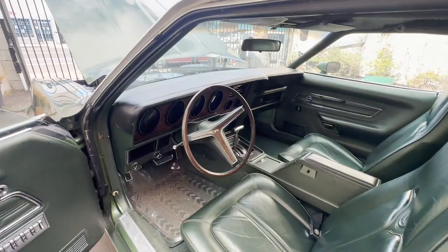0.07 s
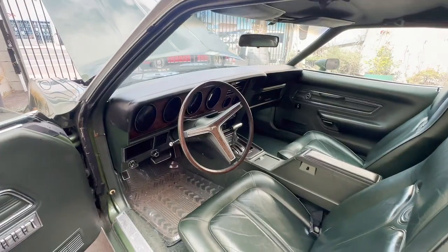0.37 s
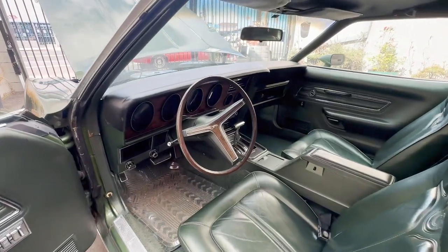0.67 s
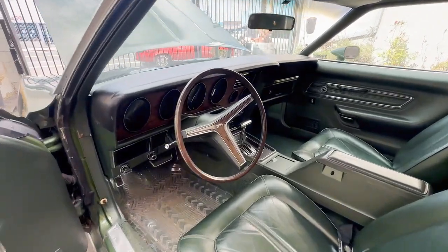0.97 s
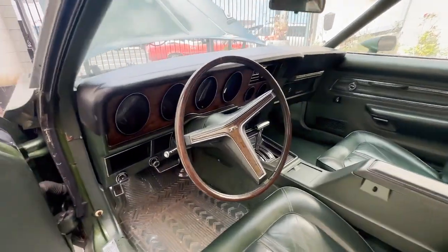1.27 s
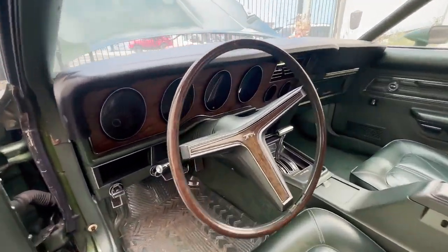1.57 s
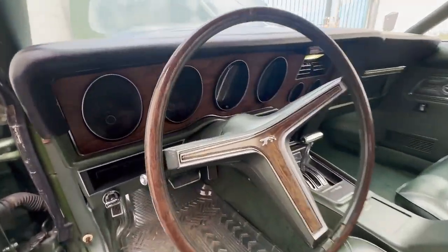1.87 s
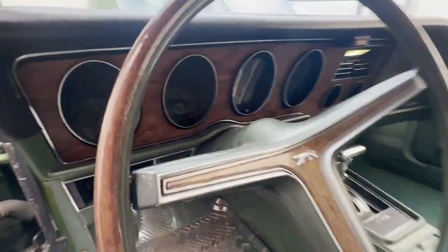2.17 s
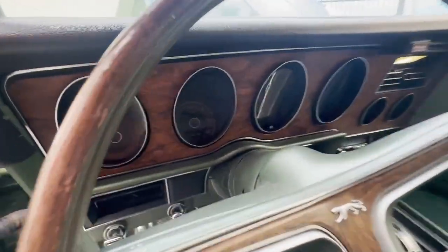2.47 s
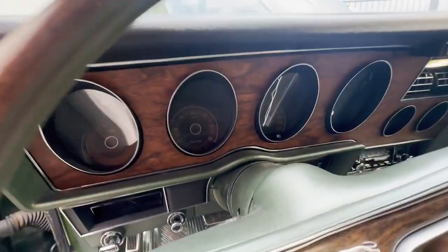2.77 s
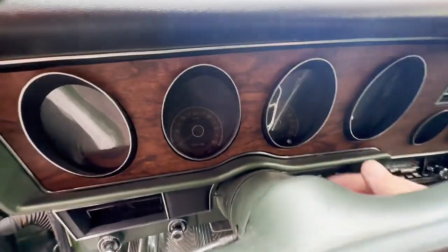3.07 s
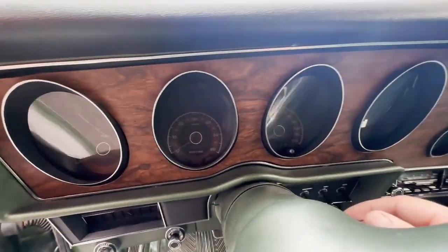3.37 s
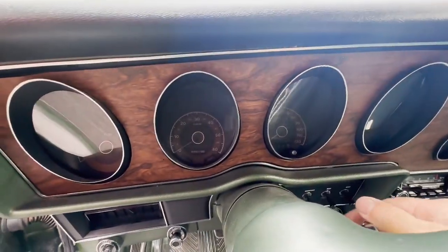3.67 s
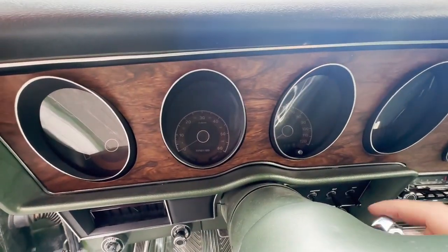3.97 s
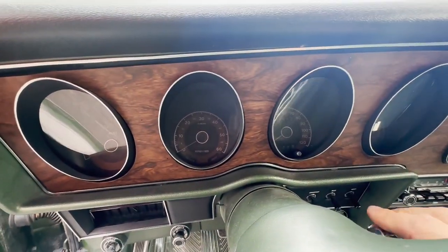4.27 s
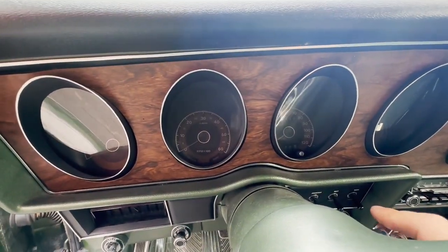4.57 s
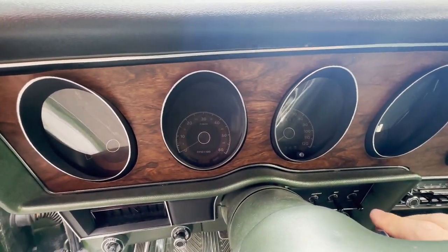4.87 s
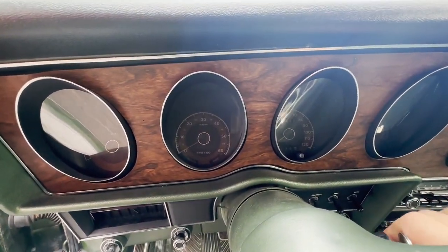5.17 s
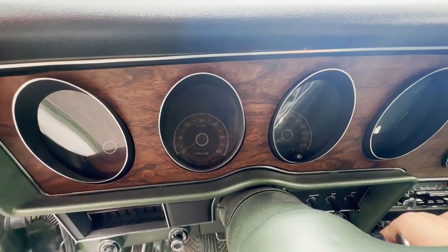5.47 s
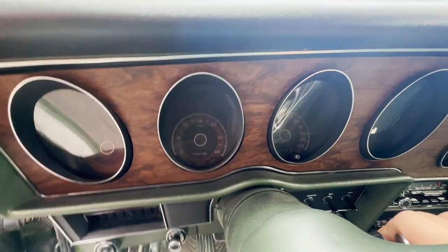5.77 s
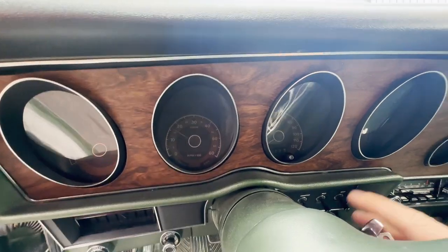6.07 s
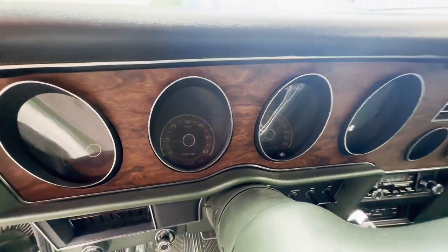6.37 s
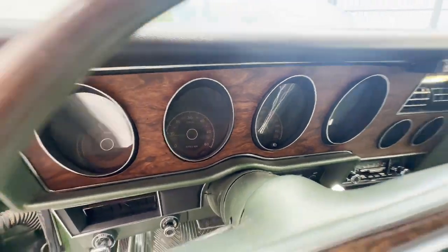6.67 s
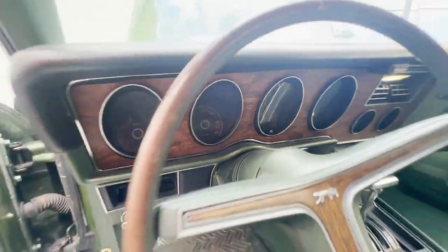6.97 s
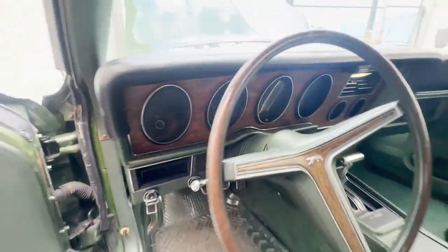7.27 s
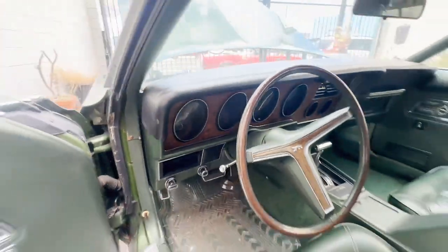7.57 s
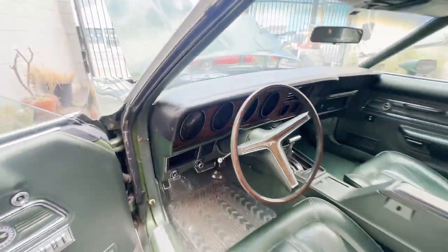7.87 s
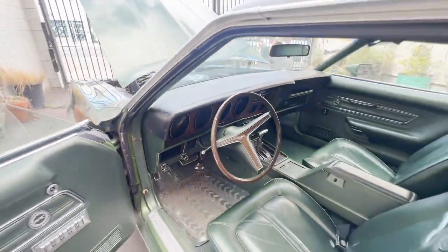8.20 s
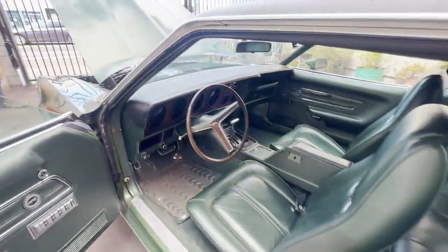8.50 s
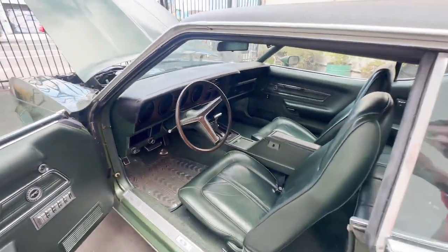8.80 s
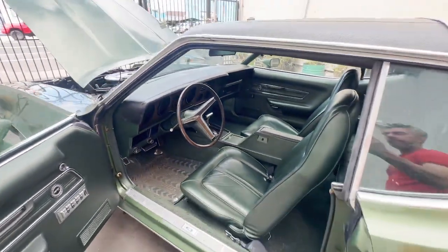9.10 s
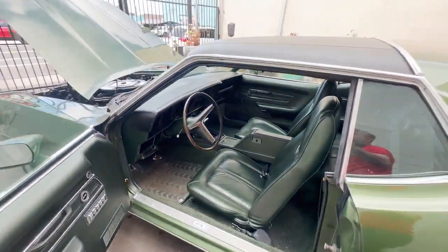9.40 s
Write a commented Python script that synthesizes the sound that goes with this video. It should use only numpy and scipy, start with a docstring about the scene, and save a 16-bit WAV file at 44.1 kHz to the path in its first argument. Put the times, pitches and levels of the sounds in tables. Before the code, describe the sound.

After keys clink and scrape into the lock, an old car engine starts with a boom and drops to a low, throbbing idle.

```python
"""An old V8 coupe starts from cold in a yard: it flares, booms through its exhaust and sinks to a loping
idle, one puff of gas and one valve tick to each firing. Before that, keys clink and scrape into the lock;
the starter slams in and cranks, the belt squeaks, and the pinion grinds as the engine catches.
The microphone moves in through the open door to the dash, then back outside for the idle.
Traffic rumbles in the distance."""
import sys
import numpy as np
from scipy import signal
from scipy.fft import rfft, irfft, next_fast_len
from scipy.io import wavfile
from scipy.ndimage import uniform_filter1d, map_coordinates

SR = 44100
rng = np.random.default_rng(int(sys.argv[2]) if len(sys.argv) > 2 else 0)


def put_to_file(sound):
    """Save the sound as 16-bit audio at rate SR, in the file named by the first command-line argument."""
    columns = np.atleast_2d(sound).T  # one column per channel
    safe = np.clip(columns, -1, 1)
    whole_steps = np.round(safe * 32767)
    wavfile.write(sys.argv[1], SR, whole_steps.astype(np.int16))


N = 425124
CATCH_S, IDLE_RPM = 5.71, 750

# The cylinders in firing order. Each row: exhaust strength in dB, valve clatter in dB.
CYLINDERS = [(3, 2.5), (0, 5.5), (-1, 2.5), (2.5, 2.5), (-5.5, 1.5), (-4, 1), (-5.5, 2), (-2, -0.5)]
# Starter, compressions and first firing rock the block. Each row: start in seconds, then thump, sway,
# exhaust chuff and motor strain in dB.
JOLTS = [(5.094, -26, -36, -55, -47), (5.118, -13, -31, -37, -39), (5.168, -22, -34, -33, -42),
         (5.33, -28.5, -36, -34.5, -41), (5.52, -43, -44, -56, -37), (5.691, -36, -21, -33, -43)]
# The engine sits slightly left of the microphone. Each row: frequency in Hz, left over right in dB.
ENGINE_PAN = [(60, 1.0), (240, 1.5), (950, 3), (3770, 2.0), (15000, 1.6)]


def amp(db):
    """Decibels to gain."""
    return 10 ** (np.asarray(db) / 20)


def unit(x):
    """Scale so that the mean of the channels has rms 1."""
    return x / np.sqrt(np.mean(np.atleast_2d(x).mean(0) ** 2) + 1e-20)


def along(points, hz):
    """Read (Hz, value) points on a log frequency axis."""
    freqs, values = np.transpose(points)
    return np.interp(np.log(hz + 1), np.log(freqs), values)


def curve(points):
    """One value per sample from (seconds, value) points."""
    return np.interp(np.arange(N) / SR, *np.transpose(points))


def fade(start, end):
    """A ramp from 0 at start to 1 at end, in either direction."""
    return np.clip((np.arange(N) / SR - start) / (end - start), 0, 1)


def held(start, length, attack_s, release_s):
    """Gain 1 from start for length seconds; the attack before and the release after each span 60 dB."""
    t = np.arange(N) / SR - start
    return amp(-60 * np.clip(np.maximum(-t / attack_s, (t - length) / release_s), 0, 2))


def wobble(rate):
    """A smooth random curve, rate knots a second."""
    return map_coordinates(rng.standard_normal(int(N * rate / SR) + 4), [np.arange(N) * rate / SR])


def add(track, start, sound):
    """Mix a short sound into a track at start seconds."""
    part = track[..., round(start * SR):][..., :sound.shape[-1]]
    part += sound[..., :part.shape[-1]]


def filtered(x, response):
    """Pass x through a response given as a function of Hz."""
    size = 2 * next_fast_len(N // 2 + SR // 4)
    return irfft(rfft(x, size) * response(np.fft.rfftfreq(size, 1 / SR)), size)[..., :N]


def causal(spectrum):
    """The minimum-phase response with a given (Hz, dB) spectrum."""
    def response(hz):
        cepstrum = irfft(np.log(amp(along(spectrum, hz))))
        half = len(cepstrum) // 2
        cepstrum[1:half] *= 2
        cepstrum[half + 1:] = 0
        return np.exp(rfft(cepstrum))
    return response


def resonance(f, hz, width):
    """The response at f of two like resonators in series, each width Hz wide."""
    return (1j * f * width / (hz * hz - f * f + 1j * f * width)) ** 2


def narrow(hz, width):
    """Unrelated left and right noise in one resonance."""
    return unit(filtered(rng.standard_normal((2, N)), lambda f: resonance(f, hz, width)))


def spread(pair, pan):
    """A direct and a scattered signal become left and right at the microphone."""
    # Stereo width. Each row: frequency in Hz, side gain in dB.
    width = [(60, -22), (150, -5.5), (380, -4), (950, 1), (2380, 0), (5980, 1), (15000, -12)]
    mid, side = pair[0], filtered(pair[1], lambda hz: amp(along(width, hz)))
    left_right = np.array([mid + side, mid - side])
    return filtered(left_right, lambda hz: amp(np.outer([.5, -.5], along(pan, hz))))


def rush(spectrum, pan):
    """Stereo noise with a given (Hz, dB) spectrum, at unit level."""
    noise = filtered(rng.standard_normal((2, N)), lambda hz: amp(along(spectrum, hz)))
    return unit(spread(noise, pan))


def cabin(x, wet_db, t60=0.1):
    """Dash, glass and seats return a short, dense echo, different on each side of the microphone."""
    t = np.arange(SR // 5) / SR
    tail = rng.standard_normal((2, len(t))) * amp(-60 * t / t60) * (t > .002)
    echo = signal.fftconvolve(x, tail / np.linalg.norm(tail[0]), axes=1)[:, :N]
    return (x + amp(wet_db) * echo) / np.hypot(1, amp(wet_db))


def distant_traffic(outside):
    """A throbbing rumble from far off, with tyre noise and a midrange hum that the cabin shields."""
    # Two noise spectra. Each row: frequency in Hz, level in dB.
    rumble_spectrum = [(13, -43), (22, -11), (43, -1.5), (70, -4), (102, 4), (134, -5), (150, -13),
                       (198, -9.5), (400, -19.5), (520, -41), (880, -120)]
    tyre_spectrum = [(140, -30), (270, -7), (480, -2), (690, -1), (820, -1.5), (1100, -3.5), (1650, -11.5),
                     (2350, -19), (3300, -31), (5200, -38), (14500, -65)]
    # The street lies slightly left. Each row: frequency in Hz, left over right in dB.
    pan = [(60, 1.0), (380, 2.6), (2380, 2.0), (15000, 2.0)]
    rumble = amp(-45.5 + 1.65 * wobble(12)) * rush(rumble_spectrum, pan)
    tyres = amp(-53 + 5.5 * outside + 0.74 * wobble(10)) * rush(tyre_spectrum, pan)
    hum = amp(-49) * outside * narrow(hz=741, width=164)
    return rumble + tyres + hum


def ignition_key():
    """Close by at the dash, keys ring together while the blade scrapes and clicks over the lock's pins."""
    # Two keys collide. Each row: start in seconds, then contact, long key and short key in dB.
    clinks = [(3.032, -39.5, -46.5, -72), (3.249, -43, -40.5, -58), (3.577, -29.5, -42, -33),
              (3.590, -37, -50, -38), (3.655, -43, -56, -36), (4.079, -26.5, -40, -36),
              (4.145, -25, -37, -40), (4.203, -53, -53, -56), (4.57, -40.5, -56, -46.5)]
    # Modes of each key. Each row: frequency in Hz, level in dB, seconds to fall 60 dB.
    long_key = [(2550, -4, 0.048), (6175, -0.5, 0.077), (7100, -9, .05), (7760, -0.5, 0.1),
                (8285, -13, .13)]
    short_key = [(5070, -17, .12), (5540, -17, .12), (7730, -4.5, 0.2), (12100, 0, 0.094),
                 (13250, -11, .04), (14840, -15, .07)]
    # Trim, lock, switch and solenoid. Each row: start in seconds, snap in dB, knock against snap in dB.
    clicks = [(.902, -46.5, -4), (0.99, -44.5, 4), (1.768, -50, 12.5), (2.093, -46.5, 6.5),
              (2.42, -51.5, 16.5), (2.549, -45.5, 4.5), (3.401, -34.5, -4.5), (3.418, -41, -2),
              (3.451, -28, -17), (3.512, -40, 6.5), (3.625, -27.5, -9), (3.672, -26.5, -10),
              (3.681, -32, -18), (3.824, -43, -18), (3.875, -43, -17), (4.057, -27, -15),
              (4.105, -25.5, -10.5), (4.232, -29, -0.5), (4.881, -49, 2), (4.963, -33, -1),
              (4.997, -27, -5.5), (5.074, -34, 5)]
    # The switch rings the dash. Each row: start in seconds, pitch in Hz, level in dB, t60 in seconds.
    detents = [(4.961, 525, -34.5, 0.33), (4.998, 1105, -38, 0.18)]
    # Sleeve and key slide. Each row: start in seconds, length in seconds, level in dB.
    strokes = [(1.194, 1.47, -65.5), (2.754, 0.65, -71.5), (2.155, 0.024, -68), (2.305, 0.2, -66.5),
               (3.114, 0.081, -63), (3.53, 0.42, -56.5), (3.688, 0.076, -52.5), (3.95, 0.018, -54),
               (4.067, 0.053, -52), (4.396, .27, -61), (4.877, 0.19, -57)]
    # Spectra of the contacts and of the steering column under them. Each row: frequency in Hz, level in dB.
    scrape_spectrum = [(710, -36), (1200, -5), (1340, -0.5), (4500, -11.5), (8040, -12), (15600, -29)]
    snap_spectrum = [(1180, -17), (2000, -8), (3560, -8.5), (4340, -7), (5110, -7), (7030, -4.5),
                     (10700, -10), (12400, -19), (15600, -15)]
    knock_spectrum = [(200, -30), (550, 2), (1400, 0.5), (2500, -7.5), (5000, -33)]
    column_spectrum = [(110, -17), (170, 3), (330, -5.5), (560, -6.5), (1100, -25), (2500, -60)]
    # The lock is to the left. Each row: frequency in Hz, left over right in dB.
    pan = [(60, 1.0), (240, 1.5), (950, 3.8), (3770, 7.2), (15000, 2.9)]
    t = np.arange(SR // 3) / SR
    rings, snaps, knocks = np.zeros((2, N)), np.zeros(N), np.zeros(N)
    onset = 1 - np.exp(-t / 0.00077)
    click_decay = amp(-60 * t / .07)
    for start, contact_db, long_db, short_db in clinks:
        rebound_s = .012 * rng.uniform(.5, 1.5)  # loose keys touch again, more softly
        for delay, loss_db in (0, -1), (rebound_s, -7):
            for db, modes in (long_db, long_key), (short_db, short_key):
                for hz, mode_db, t60 in modes:
                    size = amp(db + loss_db + mode_db + rng.normal(0, 2.4, (2, 1)) - 60 * t / t60)
                    pitch = hz * (1 + rng.normal(0, .003))
                    cycles = pitch * t + 0.4 * rng.random((2, 1))
                    add(rings, start + delay, onset * size * np.sin(2 * np.pi * cycles))
        add(snaps, start, onset * amp(contact_db - 5.5) * click_decay)
    # the trim's rattle outlasts the contact itself
    click = (1 - np.exp(-t / 0.00089)) * (1.11 * click_decay + 0.84 * amp(-60 * t / 0.0091))
    for start, db, knock_db in clicks:
        add(snaps, start, amp(db - 8.5) * click)
        add(knocks, start, amp(db + knock_db - 3.5) * click)
    for start, hz, db, t60 in detents:
        add(rings, start, onset * amp(db - 60 * t / t60) * np.sin(2 * np.pi * hz * t))
    sliding = sum(amp(db) * held(s, length, attack_s=0.093, release_s=0.52) for s, length, db in strokes)
    scrape = amp(2.7 * wobble(70) + 2.8 * wobble(400) - 1) * rush(scrape_spectrum, pan)
    column = amp(0.5) * rush(column_spectrum, pan)
    contacts = snaps * rush(snap_spectrum, pan) + knocks * rush(knock_spectrum, pan)
    return rings + cabin(contacts + sliding * (scrape + column), wet_db=-7.5)


def starter(firings, rpm):
    """The motor labours over each compression; the engine outruns it and the pinion grinds on the ring."""
    # Two noise spectra. Each row: frequency in Hz, level in dB.
    motor_spectrum = [(180, -31), (300, 1), (478, 0), (554, 0.5), (883, -2.5), (1000, -7), (1730, -9.5),
                      (1990, -14), (2550, -12.5), (3200, -23), (4160, -18), (7040, -120)]
    gear_spectrum = [(880, -18), (1500, -5), (1640, -5), (1940, -4.5), (2220, -5.5), (2620, -3),
                     (3100, -9.5), (6040, -13), (7420, -16), (8030, -13), (15600, -37.5)]
    # Modes of the ring gear. Each row: frequency in Hz, half-width in Hz, level in dB.
    ring_gear = [(1267, 22, -1.5), (1340, 21, 4), (1570, 7, 2.5), (1890, 18, -4.5), (1946, 20, -8),
                 (1960, 12, -7), (2115, 14, -9), (2560, 12, -12), (2584, 10, 0.5), (2640, 12, -3),
                 (2745, 10, -8)]
    # The starter is well to the left. Each row: frequency in Hz, left over right in dB.
    pan = [(60, 0.0), (180, 18), (550, 1.5), (1650, 6.5), (4970, 11.5), (15000, 0)]
    engage_s = 5.1
    slam = held(engage_s, 0.019, attack_s=0.07, release_s=0.19)
    spin = held(engage_s, .83, attack_s=0.12, release_s=1)
    race = (rpm / 1000) ** 2
    motor_gain = amp(-32) * slam + amp(-39 + 5.9 * race) * spin
    gear_gain = amp(-26.5) * slam + amp(-50 + 20.9 * race) * spin
    strain = sum(amp(db) * held(s, 0.014, attack_s=0.14, release_s=0.076) for s, *_, db in JOLTS)
    load = np.cos(2 * np.pi * firings)
    motor = (motor_gain + strain) * amp(1.3 * load) * rush(motor_spectrum, pan)
    gears = gear_gain * amp(2.0 + wobble(150)) * rush(gear_spectrum, pan)
    teeth = rng.standard_normal((2, N)) * amp(2.5 * load + 1.1 * wobble(200))
    modes = lambda f: sum(amp(db) / (1 + ((f - hz) / width) ** 2) for hz, width, db in ring_gear)
    overrun = held(5.755, 0.2, attack_s=0.12, release_s=0.23)
    grind = overrun * amp(-20.5 + 1.5 * load) * unit(spread(filtered(teeth, modes), pan))
    return cabin(motor + gears, wet_db=-9) + grind


def belt_squeaks():
    """The cold belt chirps as it takes up speed, then whistles faintly as the speed sinks."""
    # Each row: start in seconds, pitch in Hz, width in Hz, level in dB, seconds to fall 60 dB.
    squeaks = [(5.512, 5500, 600, -34.5, 0.21), (5.565, 10640, 330, -42, 0.26),
               (5.66, 9900, 400, -39, 0.46)]
    t = np.arange(SR // 2) / SR
    onset = 1 - np.exp(-t / 0.0065)
    belt = amp(-60) * held(6.6, 0.89, attack_s=.9, release_s=0.99) * narrow(hz=8750, width=280)
    for start, hz, width, db, t60 in squeaks:
        add(belt, start, narrow(hz, width)[:, :len(t)] * amp(db + 3.5 - 60 * t / t60) * onset)
    return belt


def block_jolts():
    """The engine block thumps and sways on its mounts."""
    # Each row: frequency in Hz, level in dB, seconds to fall 60 dB.
    block_modes = [(57, -7.5, 0.87), (85.5, -4, 0.6), (130.5, 6, 0.19), (150.7, 4.5, 0.27), (265, -9, .15)]
    t = np.arange(SR // 2) / SR
    onset = 1 - np.exp(-t / 0.0065)
    thump = sum(amp(db - 60 * t / t60) * np.sin(2 * np.pi * hz * t) for hz, db, t60 in block_modes)
    sway = amp(-60 * t / 0.58) * np.sin(2 * np.pi * 39 * t)
    block = np.zeros(N)
    for start, thump_db, sway_db, *_ in JOLTS:
        add(block, start, (amp(thump_db) * thump + amp(sway_db) * sway) * onset)
    return block


def body_drone(firings, outside):
    """The body panels hum, swelling once in each round of the cylinders."""
    # Each row: frequency in Hz, level at the dash in dB, level outside in dB.
    panels = [(169.5, -61.5, -30), (204.2, -30, -44), (223.4, -41.5, -32)]
    throb = 1 + 0.64 * np.cos(2 * np.pi * (firings / len(CYLINDERS) - .12))
    hum = np.zeros(N)
    for hz, dash_db, outside_db in panels:
        gain = amp(dash_db + (outside_db - dash_db) * outside + 1.3 * wobble(14))
        hum += gain * np.sin(2 * np.pi * np.cumsum(hz + 9 * wobble(25)) / SR)
    return throb * hum


def engine_bay(firings, rpm, outside):
    """The fan rushes; valve gear ticks at every firing, one tappet louder than the rest."""
    # Two noise spectra. Each row: frequency in Hz, level in dB.
    fan_spectrum = [(190, -15.5), (330, 0.5), (388, -4.5), (875, -6.5), (1420, -12), (1700, -10.5),
                    (2070, -19), (2540, -21.5), (2800, -17), (3640, -29), (6160, -120)]
    clatter_spectrum = [(1180, -34), (2000, -5.5), (2300, -6.5), (2570, -3), (3320, -4.5), (3880, -4.5),
                        (5290, -5.5), (5720, -7), (7530, -7), (8070, -7), (10400, -11), (11900, -16.5),
                        (14000, -16), (15600, -23)]
    # Modes of the rocker covers. Each row: frequency in Hz, width in Hz, level in dB.
    cover_modes = [(2586, 310, -5.5), (3820, 450, -5.5), (5870, 500, -8)]
    brief_rattle = amp(-45.5) * held(7.85, 0.034, attack_s=1.0, release_s=0.15)
    valve_gain = amp(-49 + 9.67 * outside) + brief_rattle
    stroke = firings + .35  # the valves close ahead of the puff
    tappet = stroke.astype(int)
    tappet_db = np.array(CYLINDERS)[tappet % len(CYLINDERS), 1]
    tappet_db += 1.15 * rng.standard_normal(N // 100)[tappet]
    ticks = amp(tappet_db) * (0.74 + 0.65 * np.exp(-3.5 * (stroke % 1)))
    clatter = ticks * rush(clatter_spectrum, ENGINE_PAN)
    fan_db = -40.5 + 4.83 * outside + 8.2 * (rpm - IDLE_RPM) / 1000
    fan = amp(fan_db + 0.31 * tappet_db + 1.23 * wobble(70)) * rush(fan_spectrum, ENGINE_PAN)
    # each closing valve strikes the covers, which ping at new strengths
    closings = np.flatnonzero(np.diff(tappet))
    ping_decay = amp(-60 * np.arange(SR // 10) / SR / 0.056)
    pings = np.zeros((2, N))
    for hz, width, db in cover_modes:
        strike_db = tappet_db[closings] + 4 * rng.uniform(-2.4, 1.57, len(closings))
        strikes = np.bincount(closings, amp(strike_db), N)
        pings += amp(db) * signal.fftconvolve(strikes, ping_decay)[:N] * narrow(hz, width)
    return (fan + valve_gain * (clatter + amp(-2.5) * pings)) * fade(5.4, 6.2)


def exhaust(firings, rpm, outside, running):
    """One puff per firing; strong and weak cylinders make the pipe's tones lope and set it ringing."""
    # Each row: multiple of the crank speed, level while misfiring in dB, level while running in dB.
    slow_tones = [(4, -30, -31.5), (5, -13.5, -51)]
    # The pipe booms as twice the firing rate passes its resonance. Each row: that tone in Hz, level in dB.
    boom_curve = [(92, -19.5), (101, -15), (107, -9), (115, -10.5), (123, -25), (140, -50)]
    # Heard out in the yard. Each row: multiple of the crank speed, level in dB.
    pipe_overtones = [(20, -40), (24, -46.5), (26, -45)]
    # The slower it runs, the more it lopes. Each row: speed in rpm, depth from 0 to 1.
    lope_depth = [(765, 0.97), (810, 0.4)]
    # Resonances of the tailpipe. Each row: frequency in Hz, width in Hz, level in dB.
    pipe_modes = [(104.5, 22.3, 4), (45, 30, -10.5)]
    # Each row: frequency in Hz, level in dB.
    puff_spectrum = [(20, -31), (40, -3), (90, -4), (135, 6.5), (175, -0.5), (205, 1), (245, -3), (280, -7),
                     (330, -10), (420, -19.5), (700, -46.5), (1600, -100)]
    fired_at = np.flatnonzero(np.diff(np.floor(firings)) > 0)
    pulses = lambda sizes: np.bincount(fired_at, sizes, N)
    cylinder = np.arange(1, len(fired_at) + 1) % len(CYLINDERS)
    chance = rng.standard_normal((len(fired_at), 4))
    strength_db = np.array(CYLINDERS)[cylinder, 0] + 1.4 * chance[:, 0]
    lope = np.interp(rpm, *np.transpose(lope_depth))
    swell = amp(lope * map_coordinates(strength_db, [np.maximum(firings - 1, 0)], mode="nearest"))
    misfire = held(CATCH_S, .75, attack_s=0.15, release_s=0.41)  # at first too few cylinders fire
    crank_angle, boom_hz = 2 * np.pi * firings / 4, 8 * rpm / 60
    slow = sum((amp(misfire_db) * misfire + amp(even_db) * running) * np.sin(k * crank_angle)
               for k, misfire_db, even_db in slow_tones)
    boom = amp(along(boom_curve, boom_hz) - 4.05 * outside) * np.sin(8 * crank_angle)
    overtones = outside * sum(amp(db) * np.sin(k * crank_angle) for k, db in pipe_overtones)
    tones = np.sqrt(2) * (slow + (boom + overtones) * swell * running)
    # only the unevenness of the firings fills in the lines around the tones
    uneven = pulses(amp(strength_db) - amp(strength_db).mean() + .5 * chance[:, 1])
    pipe = lambda f: sum(amp(db) * resonance(f, hz, width) for hz, width, db in pipe_modes)
    ring = filtered(uneven, pipe)
    ring_power = np.abs(uniform_filter1d(ring ** 2, SR // 12)) + 1e-3 * np.mean(ring ** 2)
    first_bang = amp(-17.5) * held(5.705, .07, attack_s=0.08, release_s=.2)
    ring_gain = first_bang + amp(-19.5) * misfire + amp(-31) * running + amp(-37) * fade(5.1, 5.3)
    ring *= ring_gain / np.sqrt(ring_power)
    # each puff is a front followed by turbulent gas
    gas = rng.standard_normal((2, N)) * np.exp(-1.8 * (firings % 1)) * fade(5.1, 5.2)
    fronts = np.array([pulses(amp(0.44 * strength_db + 1.2 * chance[:, 2])), pulses(chance[:, 3])])
    puffs = unit(spread(filtered(0.59 * unit(fronts) + unit(gas), causal(puff_spectrum)), ENGINE_PAN))
    puff_db = -36.5 + 6.7 * outside + 19 * (rpm - IDLE_RPM) / 1000
    chuffs = sum(amp(db) * held(s, 0.023, attack_s=0.076, release_s=0.13) for s, _, _, db, _ in JOLTS)
    return (tones + ring) * amp([[.35], [-.35]]) + (amp(puff_db) + chuffs) * puffs


def scene():
    """A V8 fires four times a turn of the crank; its speed and the microphone's place set the levels."""
    # Cranking, flare, sag and idle. Each row: time in seconds, speed in rpm.
    crank_speed = [(5.0, 0), (5.1, 300), (5.5, 260), (5.66, 925), (5.8, 1060), (5.97, 1085), (6.35, 912),
                   (6.8, 783), (7.2, 690), (7.6, 694), (7.8, 745), (8.15, 768), (8.8, 753)]
    # Each row: time in seconds, place from 0 at the dash to 1 outside the car.
    microphone_path = [(.5, 0.92), (2.6, 0.11), (6.75, 0.053), (7.9, 0.58), (9, 0.72), (9.64, 1)]
    rpm, outside = curve(crank_speed), curve(microphone_path)
    firings = np.cumsum(rpm) * 4 / 60 / SR
    running = amp(-60 * fade(CATCH_S, CATCH_S - .25))  # rises to 1 as the engine catches
    engine = exhaust(firings, rpm, outside, running) + running * body_drone(firings, outside)
    engine += cabin(engine_bay(firings, rpm, outside), wet_db=-6) + block_jolts()
    return distant_traffic(outside) + ignition_key() + starter(firings, rpm) + belt_squeaks() + engine


def record(dry):
    """The microphone opens; it has two narrow treble dips and a band limit, and the loudest peaks are rounded
    off."""
    # Each row: frequency in Hz, width in Hz, depth from 0 to 1.
    treble_dips = [(5200, 82, 0.7), (7490, 110, 0.84)]
    ceiling, top_hz = .9, 15600

    def response(f):
        dips = [1 - depth * np.exp(-((f - hz) / width) ** 2) for hz, width, depth in treble_dips]
        return np.prod(dips, axis=0) * (f < top_hz)
    rounded = dry / (1 + (dry / ceiling) ** 8) ** (1 / 8)
    return filtered(rounded * fade(.034, 0.052), response)


dry = scene()
out = record(dry)
put_to_file(out)
```